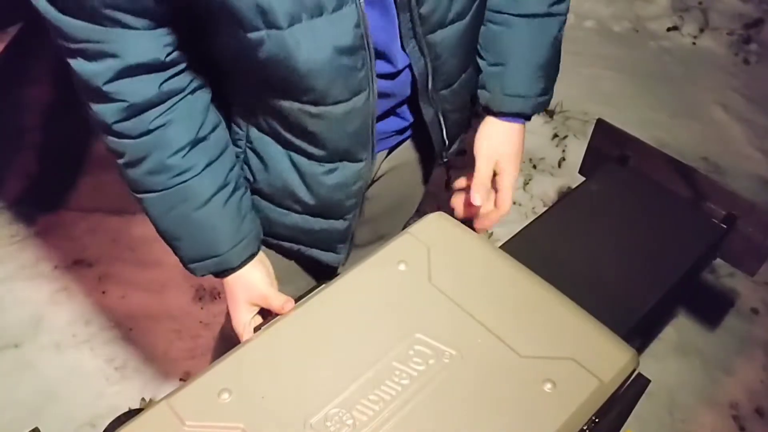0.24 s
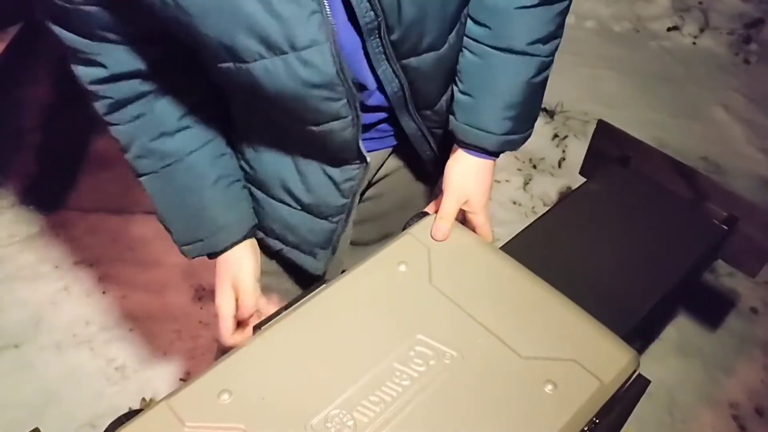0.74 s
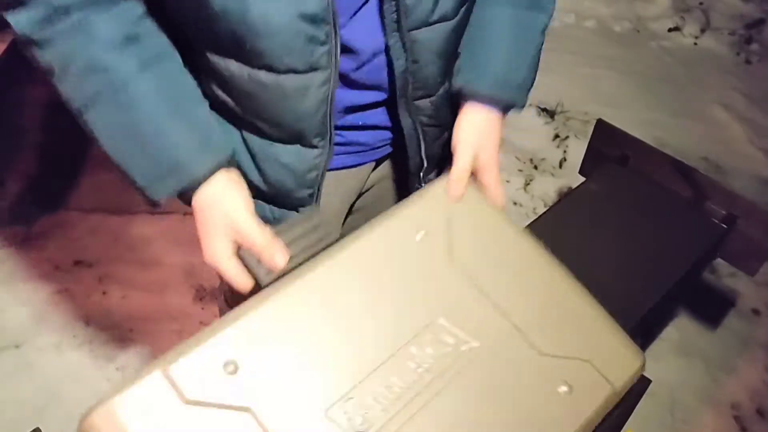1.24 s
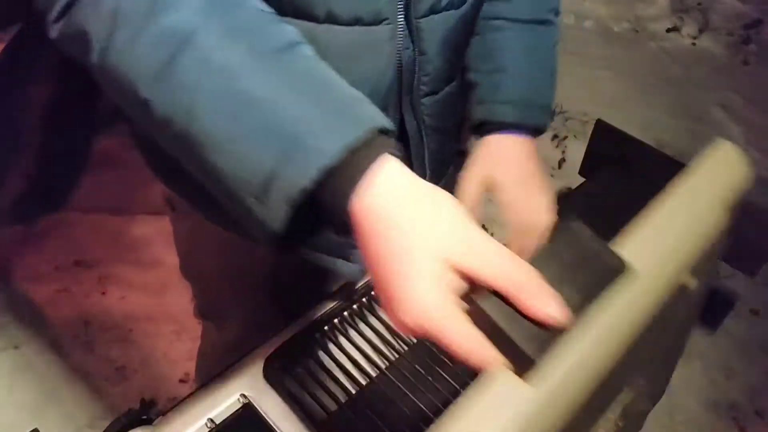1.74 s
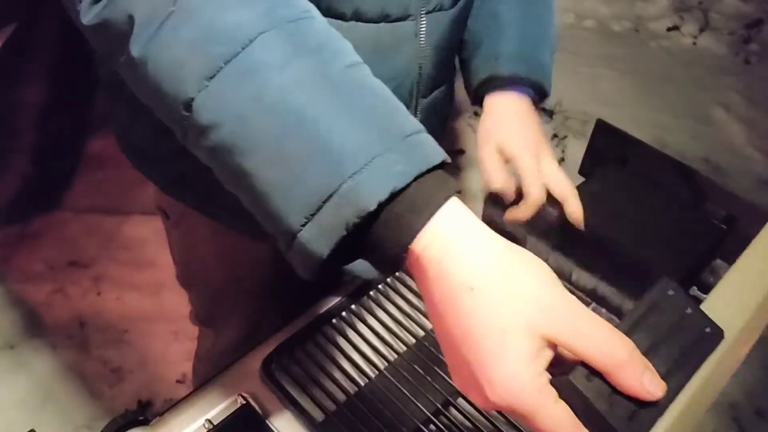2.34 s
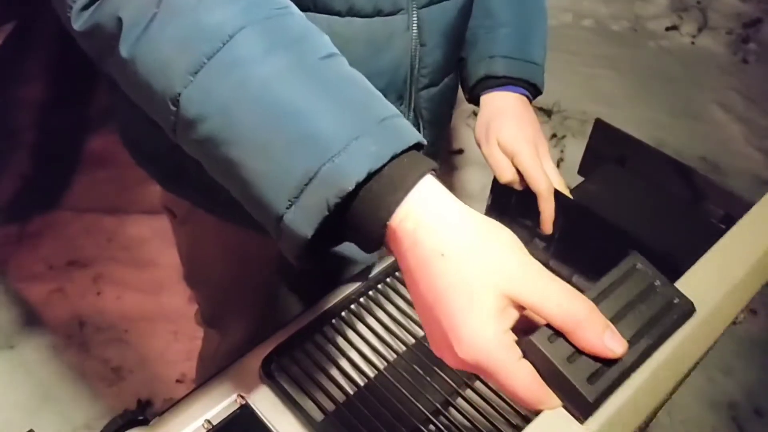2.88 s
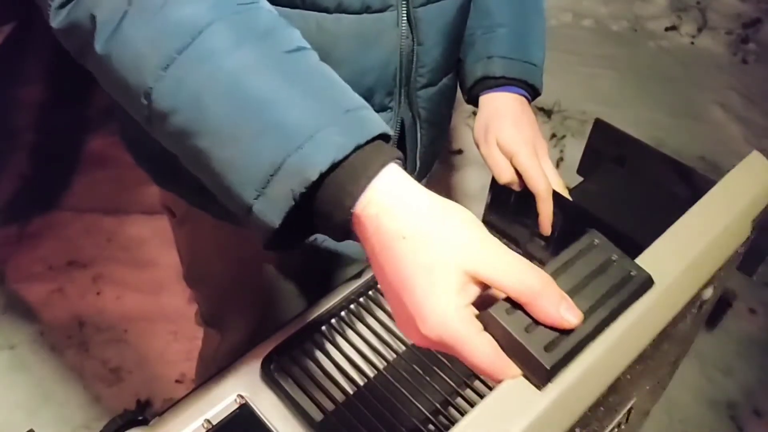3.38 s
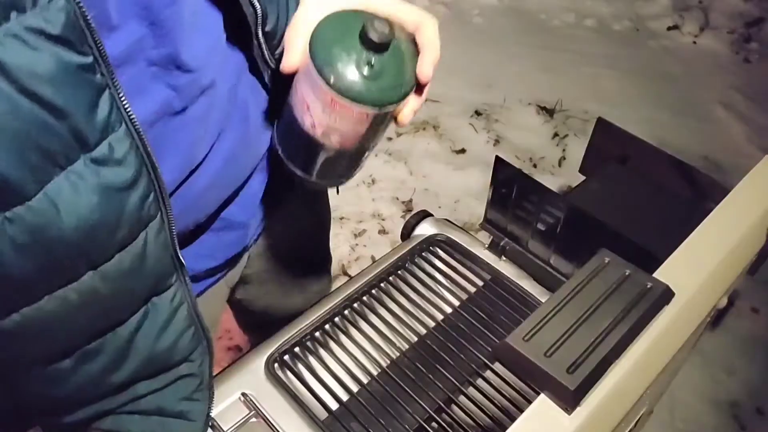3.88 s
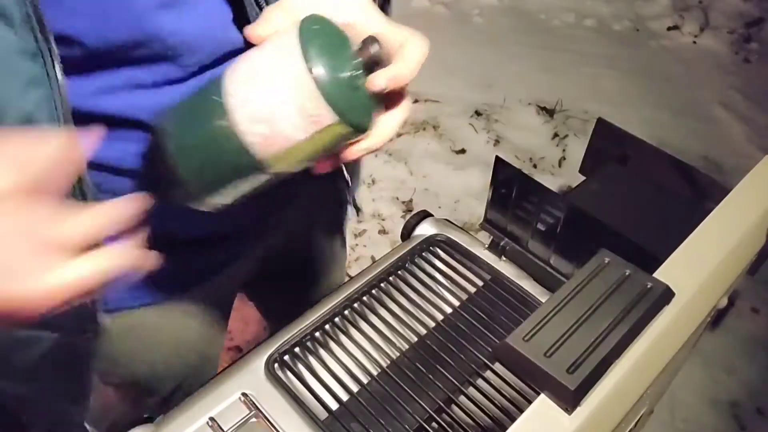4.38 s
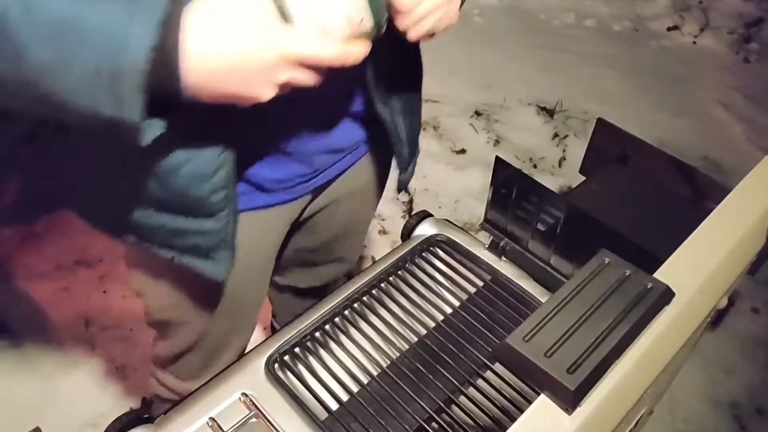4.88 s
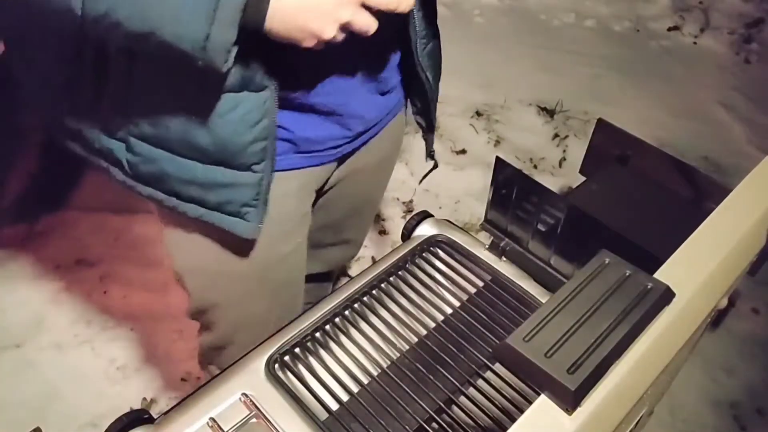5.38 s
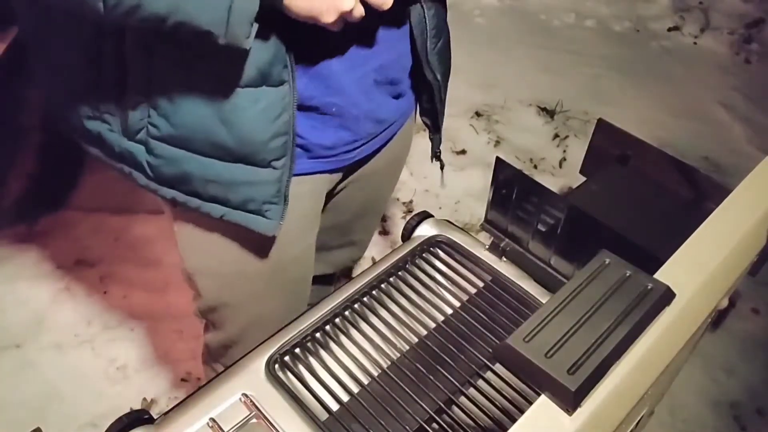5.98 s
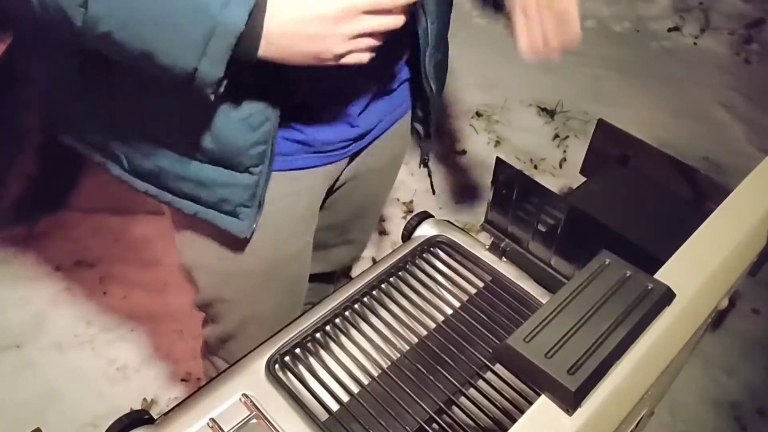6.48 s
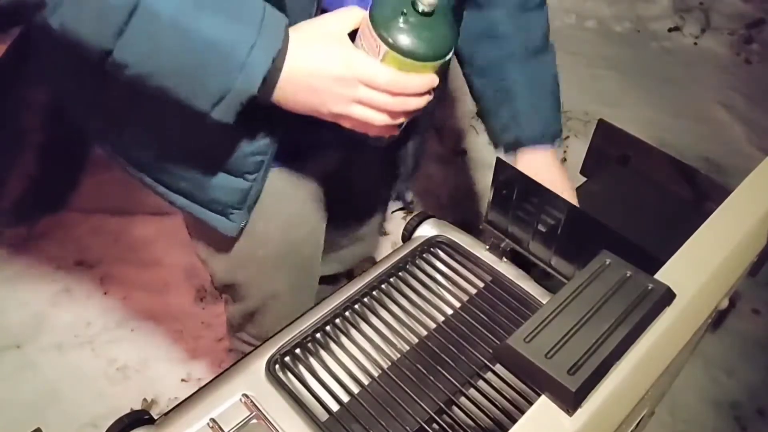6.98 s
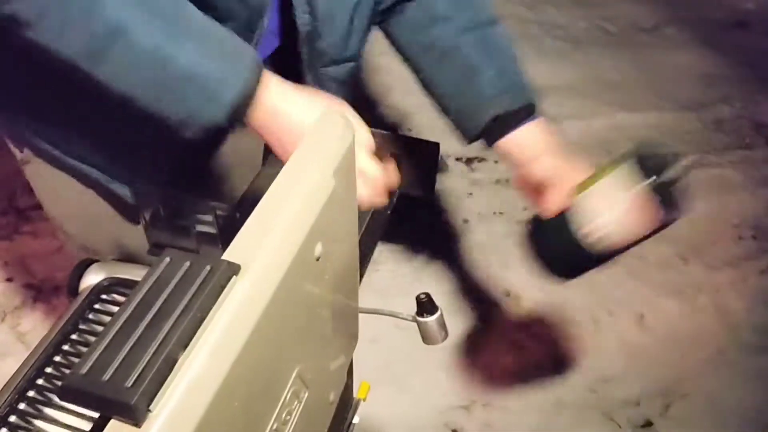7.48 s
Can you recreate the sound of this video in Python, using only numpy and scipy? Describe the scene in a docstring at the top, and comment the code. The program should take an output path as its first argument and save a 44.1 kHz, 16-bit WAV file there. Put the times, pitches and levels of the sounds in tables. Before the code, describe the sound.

Hands in a padded jacket open a camp grill: sharp hollow latch clacks, a gritty scrape, lid rattle and knocks, tiny squeaks. Around the middle a heavy low thump with microphone rumble dominates; then sparse snaps, metallic tick and quick ratcheting from a small cylinder cap. Nearby dry outdoor sound, quiet hum, hardly any wind.

```python
"""Camp grill and gas cylinder outdoors

A plastic-cased camp grill is unlatched, opened and knocked about; a small steel gas cylinder is uncapped.
Contacts are enveloped noise in four ranges, which excites damped case modes; thumps, steel and squeaks are sines.
A padded jacket and a quiet hum are noise shaped band by band; light wind is low noise with swelling rumbles.
Contacts and jacket gain short treble echoes; a microphone with a treble dip rounds the peaks and cuts the top.
"""
import sys
import numpy as np
from scipy import signal
from scipy.io import wavfile

SR = 44100
rng = np.random.default_rng(int(sys.argv[2]) if len(sys.argv) > 2 else 0)


def persist_wave(psi):
    """Save psi, clipped to +-1, as 16-bit WAV."""
    counts = np.round(np.clip(psi, -1, 1) * 32767).astype(np.int16)
    wavfile.write(sys.argv[1], SR, np.atleast_2d(counts).T)


N = 340893

# Event levels are source levels, ahead of flicker, echoes, stereo balance and microphone.
# Spectra give relative density; the noise they shape is scaled to rms 1.

# jacket: (time [s], rub level [dB], swish level [dB])
CLOTH = [(0.0, -54.5, -65.5), (0.45, -57, -65), (0.56, -64, -41), (0.71, -37, -70), (0.88, -58.5, -63),
         (1.38, -48.5, -60), (1.68, -59, -60), (1.89, -59.5, -62), (2.24, -52, -65), (2.47, -61.5, -76),
         (2.91, -67.5, -81), (3.72, -57, -73), (3.94, -56, -66.5), (4.35, -53, -59.5), (4.61, -59.5, -71),
         (5.34, -52.5, -66), (5.4, -59, -73), (5.81, -58, -70), (6.7, -57.5, -65), (7.25, -54, -64.5),
         (7.5, -55.5, -60), (7.73, -50, -59)]
# low rub of the cloth: (frequency [Hz], density [dB per Hz])
RUB_SPECTRUM = [(90, -3.5), (130, -2.5), (210, -2.5), (330, 3), (480, -1.5), (710, -10), (1000, -29.5)]
# brighter swish of the cloth: (frequency [Hz], density [dB per Hz])
SWISH_SPECTRUM = [(900, -14.5), (1300, 5.5), (1750, -7.5), (3400, -3.5), (5500, -7.5), (8000, -30.5)]
# crisp treble edge of the cloth: (frequency [Hz], density [dB per Hz])
CRISP_SPECTRUM = [(7000, -15), (9000, -7), (14500, -7.5), (16300, 1.5)]
# the crisp edge's level when the swish is at its mean, and its change in dB per dB of swish
CRISP_DB, SWISH_MEAN_DB, CRISP_FOLLOWS = -72, -62.5, 1.3

# background hum: (frequency [Hz], density [dB per Hz])
HUM_SPECTRUM = [(30, -10), (118, -3.5), (150, -4.5), (480, -10.5), (990, -39), (1430, -4), (1760, -33.5),
                (7500, -45), (16000, -47)]
HUM_DB = -67.5
# likeness of the channels in cloth and hum: (frequency [Hz], left-right correlation [-1 to 1])
LIKENESS = [(60, 0.9), (240, 1), (950, 0.073), (3500, 0.0042)]

# low wind and handling at the microphone: (time [s], level [dB], t60 [s], left over right [dB])
RUMBLES = [(0.6, -47.5, 1.3, -2), (3.858, -31.5, 0.83, -2), (5.92, -44.5, 0.54, 7), (6.11, -40, 0.63, -4),
           (7.05, -48.5, 1.03, 4), (7.65, -56, 1.4, -17)]
BREEZE_DB, RUMBLE_BUILD_S = -68.5, 0.041

# ranges shaken by a contact, in the order knock, clatter, tick, sizzle:
# (low [Hz], high [Hz], t60 factor [ratio], left-right correlation [-1 to 1], share of the pan [ratio])
RANGES = [(164, 651, 1.18, 0.94, -.08), (981, 3440, 1.17, 0.12, 0.93), (3460, 6760, 0.69, 0.071, 0.9),
          (8990, 37000, 0.26, 0.19, 1)]
# case, grate and hinge modes: (frequency [Hz], relative level [dB], t60 [s])
CASE_MODES = [(236, 2, .1), (270, -2, .15), (444, -3, .12), (493, -2, .1), (632, -2, .08), (1295, -9, .08),
              (1540, -11, .15), (2030, -12, .12), (2920, -11, .06), (3300, -9, .09), (4000, -9, .08),
              (4700, -9, .09), (5600, -9, .08), (747, -12, .2)]
# position of the hands: (time [s], treble left over right [dB], sizzle above tick [dB])
PLACE = [(0.501, 6.5, 1.5), (0.97, 1.5, 3), (2.301, 5.5, -4), (2.999, 7, -15.5), (3.601, 2.5, -12),
         (3.719, -4.5, 2), (4.101, -2, 6.5), (4.199, 3, 4), (5.2, 9.5, 7), (6.15, 4, 0.5), (6.451, 1, -15),
         (6.95, 0.5, -25), (7.03, 4, -3), (7.7, -1, -22)]

# In contact tables weight is knock above clatter, sharpness is tick above clatter, pitch is that of the # part
# struck, and each range scales t60 by its factor. # scrapes and scuffs, which swell, with the low body of the
# case thud at 3.855 s and the cap's softer first # ratchet click at 6.466 s: (time [s], clatter level [dB],
# weight [dB], sharpness [dB], t60 [s], # pitch [Hz], swell [s])
SCRAPES = [(0.2985, -56, 9.5, -2.5, 0.89, 4860, 0.039), (0.66, -43.5, 14, 8, 0.16, 2830, 0.048),
           (0.9491, -30, 8.5, -3, 0.21, 1340, 0.021), (0.978, -39.5, 16, -16, 0.11, 2000, 0.016),
           (1.019, -36, 10, -2, 0.2, 890, 0.011), (1.082, -42, 2, -3, 0.18, 1520, 0.0082),
           (1.147, -43.5, -21, -0.5, 0.086, 1630, 0.0059), (1.492, -44.5, -13, -20, 0.1, 1430, 0.007),
           (2.0292, -60, 19.5, 7, 0.91, 1320, 0.0024), (2.0992, -43.5, 9, 7.5, 0.22, 3400, 0.018),
           (2.256, -52.5, -3, -0.5, 0.19, 3450, 0.011), (2.3184, -52, 11.5, 0.5, 0.11, 1300, 0.0088),
           (3.855, -39.5, 15.5, -5, 0.2, 304, 0.014), (4.14, -46, -22, 3, 0.44, 3170, 0.01),
           (4.255, -35.5, -1.5, -6.5, 0.17, 4270, 0.006), (4.3514, -54, -4, 6.5, 1, 4470, 0.0027),
           (4.479, -38.5, -5, 5, 0.15, 3800, 0.023), (5.3191, -55, 10.5, -11, 0.085, 1330, 0.022),
           (6.17, -29, -15, -4, 0.02, 3670, 0.0073), (6.225, -56.5, -12, 6, 0.2, 4070, 0.017),
           (6.466, -44.5, -10, 0, 0.04, 3270, 0.0057), (6.745, -54, 6.5, -6, 0.17, 1340, 0.015),
           (7.0794, -49.5, 8.5, 3, 0.15, 3140, 0.06), (7.1386, -48, 6, -3.5, 0.11, 990, 0.041),
           (7.5287, -38, -2.5, -9, 0.21, 890, 0.061), (7.59, -53.5, -3, 3, 0.2, 3200, 0.038),
           (7.705, -50, 9.5, 2, 0.14, 2570, 0.014)]
# blows on the grill: (time [s], clatter level [dB], weight [dB], sharpness [dB], t60 [s], pitch [Hz])
BLOWS = [(0.5273, -15.5, 12.5, 3, 0.24, 1390), (0.612, -13, 6.5, -2.5, 0.14, 3046),
         (0.881, -53, 20, -18, 1, 1440), (0.9202, -32, -1, -2.5, 0.24, 1550),
         (1.5596, -35.5, 7.5, -25, 0.34, 1480), (1.6191, -27, -31.5, -4.5, 0.089, 3300),
         (1.7548, -33, -9, 3.5, 0.19, 5370), (3.0402, -62.5, 10, -14, 0.25, 1290),
         (3.1122, -59, 13.5, -12.5, 0.2, 1246), (3.27, -35, 4.5, -13.5, 0.33, 1375),
         (3.3283, -30.5, 5, 2, 0.2, 1620), (3.5477, -33, 8, 3, 0.19, 1506),
         (3.7484, -46.5, 12, -2, 0.9, 1044), (3.8194, -24.5, 7, 7, 0.08, 2920)]
# dry snaps of cap, cylinder and hands: (time [s], clatter level [dB], weight [dB], sharpness [dB],
# t60 [s], pitch [Hz])
SNAPS = [(1.483, -48.5, -14, 3.5, 0.03, 4760), (4.1728, -31, 2, 3, 0.13, 1300),
         (4.4465, -30.5, -3.5, 7.5, 0.025, 3300), (5.1352, -24.5, -1.5, -16.5, 0.014, 1144),
         (5.843, -50.5, 1.5, -21, 0.045, 1355), (6.1125, -41.5, -2.5, -19, 0.23, 1124),
         (6.8368, -28.5, -5.5, -19, 0.073, 1970), (6.8432, -28, -20, 1, 0.02, 2570),
         (6.9015, -28, -18, -14.5, 0.015, 2130), (7.0449, -47.5, 5, 1.5, 0.12, 1040),
         (7.669, -38, 6.5, -10, 0.027, 2340)]
BLOW_BUILD_S, SNAP_BUILD_S = 0.0045, 0.0016
SLIPS_PER_S, SLIP_S = 320, 0.0015   # mean rate and decay time of a rubbing part's catches

# thumps of the hollow case: (time [s], frequency [Hz], level [dB], t60 [s])
THUMPS = [(0.544, 121, -23.5, 0.41), (0.629, 159, -26, 0.31), (0.883, 264, -24, 0.02),
          (0.897, 271, -21.5, 0.081), (0.922, 264, -23.5, 0.084), (1.015, 302, -23.5, 0.085),
          (1.038, 101.6, -33, 0.22), (1.212, 300, -42.5, 0.13), (1.306, 316, -45, 0.092),
          (1.36, 283, -42, 0.11), (1.436, 308, -43, 0.17), (2.139, 110, -44.5, 0.22),
          (3.351, 160, -43, 0.5), (3.588, 105, -42.5, 0.14), (3.767, 130, -22, 0.3),
          (3.827, 211, -30, 0.26), (3.851, 122, -9, 0.16), (3.884, 131, -17, 0.16),
          (3.925, 127.5, -23.5, 0.16), (4.048, 151, -41.5, 0.28), (7.046, 111, -42, 0.06),
          (7.668, 264, -33.5, 0.13)]
# thumps below GENTLE_DB build over a share of their t60, harder ones over a fixed time
GENTLE_DB, THUMP_BUILD_SHARE, HARD_BUILD_S = -36, 0.078, 0.0045

# thin steel after a tap, first grate, then lid stay, then cylinder:
# (time [s], frequency [Hz], level [dB], t60 [s])
STEEL = [(0.62, 1233, -46.5, 0.75), (0.622, 2800, -57, 0.68), (3.335, 834, -51, 0.83),
         (3.335, 1780, -46.5, 0.23), (3.553, 1806, -48.5, 0.4), (5.139, 1845, -35, 0.17),
         (6.168, 1890, -45, 0.31)]
# short squeaks: (time of the middle [s], frequency [Hz], level [dB], length [s], overtone level [dB])
SQUEAKS = [(1.867, 1330, -49.5, 0.033, -12.5), (1.908, 1363, -58, 0.045, -6),
           (3.98, 1289, -50.5, 0.025, -21.5), (4.074, 1280, -52.5, 0.027, -45.5),
           (6.636, 1210, -52, 0.025, -15), (6.782, 401, -43.5, 0.014, -16)]
SQUEAK_SAG_PER_S = 0.32   # share of its pitch that a squeak loses each second
TONE_BALANCE_DB = np.array([[-1.5], [1.5]])   # left, right

# ratcheting cap
RATCHET_S, RATCHET_GAP_S = 6.4835, 0.0167   # first click, spacing
RATCHET_DB, RATCHET_LOSS_DB = -41, 0.8   # first clatter level, loss per click
RATCHET_WEIGHT_DB, RATCHET_SHARP_DB, RATCHET_T60_S, RATCHET_HZ = -10, -4, 0.022, 3200

# microphone: centre of the dip, share of that band subtracted, upper cutoff
MIC_DIP_HZ, MIC_DIP_SHARE, CUTOFF_HZ = 6930, 0.5, 16600


def amp(db):
    """Decibel law: 20 dB is a factor of ten in amplitude."""
    return 10 ** (np.asarray(db) / 20)


def rms_one(x):
    """Power normalization: scales a signal to rms 1."""
    return x / np.sqrt(np.mean(x ** 2) + 1e-20)


def in_time(rows):
    """Linear interpolation: reads the columns of a time table at every sample."""
    s, *columns = np.transpose(rows)
    return [np.interp(np.arange(N) / SR, s, c) for c in columns]


def at_hz(points, hz):
    """Logarithmic frequency scale: reads a spectrum between its points."""
    table_hz, values = np.array(points).T
    return np.interp(np.log(hz), np.log(table_hz), values)


def band(x, low_hz, high_hz, order=2):
    """Band-pass filtering: keeps one range, with its top limited to 0.45 SR."""
    edges = [low_hz, min(high_hz, .45 * SR)]
    return signal.sosfilt(signal.butter(order, edges, "band", fs=SR, output="sos"), x)


def drift(rate):
    """Low-pass random process: slow chance of rms 1, with two poles at rate [Hz]."""
    step = 40   # samples between drawn points
    r = np.exp(-2 * np.pi * rate * step / SR)
    white = rng.standard_normal(N // step + 2002)
    slow = signal.lfilter([1], [1, -2 * r, r * r], white)[2000:]   # drops the filter's start
    return np.interp(np.arange(N) / step, np.arange(len(slow)), rms_one(slow))


def ring(x, hz, t60):
    """Damped resonance: one mode, whose gain for white noise is 1 whatever its decay."""
    r, w = amp(-60 / (t60 * SR)), 2 * np.pi * hz / SR
    drive = np.sqrt((1 - r * r) / 2) * np.array([1, 0, -1])
    return signal.lfilter(drive, [1, -2 * r * np.cos(w), r * r], x + 1e-18)


def envelope(t, build, t60):
    """Exponential growth and decay: swells up to t = 0, then falls 60 dB in t60."""
    rise = t / max(build, 1e-4)
    decay = -np.log(1000) * t / max(t60, .005)
    return np.exp(np.where(t < 0, rise, decay))


def stereo(mid, side, alike):
    """Interchannel correlation: mixes mid and side into left and right of the given likeness."""
    alike = np.clip(alike, -1, 1)
    return (np.sqrt(1 + alike) * mid + np.sqrt(1 - alike) * side * [[1], [-1]]) / np.sqrt(2)


def coloured(spectrum, patchy_db, grain_db):
    """Spectral shaping: narrow bands of grainy stereo noise flicker partly together; rms 1."""
    low_hz, top_hz = spectrum[0][0], spectrum[-1][0]
    edges = np.geomspace(low_hz, top_hz, int(3 * np.log2(top_hz / low_hz)) + 2)   # about third octaves
    out, together = 0, drift(27)
    white = rng.standard_normal((2, 2, N)) * amp(grain_db * drift(150))
    for k, (low, high) in enumerate(zip(edges, edges[1:])):
        mid, side = band(white[k % 2], low, high)
        hz = np.sqrt(low * high)
        gain = amp(at_hz(spectrum, hz) + patchy_db * (0.5 * together + drift(15)))
        out = out + gain * stereo(mid, side, at_hz(LIKENESS, hz))
    return rms_one(out)


def jacket():
    """Friction noise: rub, swish and a crisp edge that follows the swish, as shaped noise."""
    rub_db, swish_db = in_time(CLOTH)
    crisp_db = CRISP_DB + CRISP_FOLLOWS * (swish_db - SWISH_MEAN_DB)
    cloth = amp(rub_db) * coloured(RUB_SPECTRUM, patchy_db=0.5, grain_db=-0.5)
    cloth += amp(swish_db) * coloured(SWISH_SPECTRUM, patchy_db=1.5, grain_db=0.0)
    cloth += amp(crisp_db) * coloured(CRISP_SPECTRUM, patchy_db=1.0, grain_db=0.0)
    return cloth


def nearby(x, echo_db=0.5, low_hz=900):
    """Early reflection: lid, tray and ground return dense treble echoes, different at each port."""
    size, t60_s = 8192, .06
    echoes = band(rng.standard_normal((2, size)), low_hz, SR / 2)
    echoes = echoes * envelope(np.arange(size) / SR, 1, t60_s)
    echoes = echoes / np.sqrt(np.sum(echoes ** 2, axis=1, keepdims=True))
    return x + amp(echo_db) * signal.fftconvolve(x, echoes, axes=1)[:, :N]


def hum():
    """Stationary noise: a steady background spectrum with slight random flicker."""
    return amp(HUM_DB) * coloured(HUM_SPECTRUM, patchy_db=-1.0, grain_db=1.0)


def wind():
    """Pressure fluctuation: lumpy low noise at the microphone ports, only partly shared by them."""
    t = np.arange(N) / SR
    mid, side = band(rng.standard_normal((2, N)), 39, 85, order=3) * amp(1.2 * drift(12))
    level = amp(BREEZE_DB)
    for s, level_db, t60, pan_db in RUMBLES:
        gains = amp([[level_db + pan_db / 2], [level_db - pan_db / 2]])
        level = level + gains * envelope(t - s, RUMBLE_BUILD_S, t60)
    return level * rms_one(stereo(mid, side, 0.56))


def stick_slip(slip):
    """Stick-slip friction: random catches decay on a steady part; rms 1."""
    caught = (rng.random(N) < SLIPS_PER_S / SR) * rng.exponential(1, N)
    catches = signal.lfilter([1], [1, -np.exp(-1 / (SLIP_S * SR))], caught)
    return rms_one(1 + slip * catches)


def contacts(rows, ring_db, crack_db, chatter_db, slip=0, crest_db=11.5, crack_t60=0.021,
             lag_per_db=4.0, centre_db=-4.0):
    """Modal excitation: contacts build, crack and rattle in four ranges, whose noise drives modes."""
    size, lead = 16384, 2048   # samples per contact, and before its peak
    t, out = (np.arange(size) - lead) / SR, np.zeros((2, N))
    place_s, *place = np.transpose(PLACE)
    touches = drift(260)   # loose parts touch unevenly
    slips = stick_slip(slip)
    for k, (low_hz, high_hz, longer, alike, pan_share) in enumerate(RANGES):
        shake = np.zeros((2, N + size))
        for s, clatter, weight, sharp, t60, centre_hz, build in rows:
            pan, sizzle = (np.interp(s, place_s, c) for c in place)
            range_db = clatter + (weight, 0, sharp, sharp + sizzle)[k]
            # narrow bands pass less noise, so they are driven harder
            force = amp(range_db) * np.sqrt(SR / 2 / (high_hz - low_hz))
            rattle = envelope(t, build, t60 * longer)
            crack = amp(crack_db) * envelope(t, build / 2, crack_t60)
            noise = stereo(*rng.standard_normal((2, size)), alike)
            if low_hz < centre_hz * 1.1 and centre_hz < high_hz * 1.1:
                # the part struck colours the noise
                noise = (noise + amp(centre_db) * ring(noise, centre_hz, 13.0 / centre_hz)) / 2
            left, right = noise * (rattle + crack) * force
            i = round(s * SR) - lead
            # the nearer port hears it first: lag in samples
            lag = round(lag_per_db * pan_share * np.clip(pan, -8, 8))
            shake[0, i:i + size] += left * amp(pan_share * pan / 2)
            shake[1, i + lag:i + lag + size] += right * amp(-pan_share * pan / 2)
        chatter = chatter_db * (touches + drift(24.0) / 2)   # partly each range's own
        shake = shake[:, :N] * amp(chatter - crest_db) + 1e-18
        shake = shake * (slips if k else 1)   # all but the knock follow the catches
        out += band(shake, low_hz, high_hz, order=3)
        for hz, level_db, t60 in CASE_MODES:
            if ring_db is not None and low_hz <= hz * 1.05 and hz < high_hz * 1.25:
                spot = amp(level_db + ring_db + 3.5 * drift(5))   # where it is hit changes what rings
                out += ring(shake * spot, hz, t60) * np.sqrt((high_hz - low_hz) / SR)
    return out


def struck(rows, build):
    """Common contact time: hits of one kind share their build-up."""
    return [(*row, build) for row in rows]


def scrapes():
    """Stick-slip excitation: swelling contacts with little crack, their upper ranges in catches."""
    return contacts(SCRAPES, centre_db=1.5, ring_db=-5.0, crack_db=-24.5, chatter_db=1.5, slip=1.4)


def blows():
    """Impact excitation: blows crack, rattle and ring the modes of case, grate and hinge."""
    return contacts(struck(BLOWS, BLOW_BUILD_S), ring_db=-3.5, crack_db=-1.5, chatter_db=1.0)


def thumps():
    """Low cavity mode: each thump of the hollow case booms on one slightly wavering sine."""
    t, out = np.arange(N) / SR, np.zeros(N)
    waver = np.cumsum(1 + .025 * drift(12)) / SR
    for s, hz, level_db, t60 in THUMPS:
        build = THUMP_BUILD_SHARE * t60 if level_db < GENTLE_DB else HARD_BUILD_S
        near = abs(t - s) < 2 * t60
        phase = 2 * np.pi * hz * (waver[near] - waver[round(s * SR)])
        out[near] += amp(level_db) * envelope(t[near] - s, build, t60) * np.sin(phase)
    return out * amp(1.5 * drift(30))


def steel():
    """Free damped vibration: thin steel rings on after a tap as decaying sines."""
    t, out = np.arange(N) / SR, np.zeros(N)
    for s, hz, level_db, t60 in STEEL:
        near = (t > s) & (t < s + 2 * t60)
        age = t[near] - s
        out[near] += amp(level_db - 60 * age / t60) * np.sin(2 * np.pi * hz * age)
    return out * amp(TONE_BALANCE_DB)


def snaps():
    """Short impact: dry snaps and ratchet clicks crack sharply without ringing the case."""
    rows = struck(SNAPS + ratchet(), SNAP_BUILD_S)
    return contacts(rows, ring_db=None, crack_db=4.5, chatter_db=-1.0)


def squeaks():
    """Stick-slip oscillation: short wavering tones with overtones sag in pitch."""
    t, out = np.arange(N) / SR, np.zeros(N)
    waver = np.cumsum(1 + 0.027 * drift(65.0)) / SR
    for s, hz, level_db, length, upper_db in SQUEAKS:
        near = abs(t - s) < 2 * length
        age = t[near] - s
        phase = 2 * np.pi * hz * (waver[near] - SQUEAK_SAG_PER_S * age ** 2 / 2)
        overtones = sum(np.sin(k * phase) for k in (2, 3, 4))
        tone = np.sin(phase) + amp(upper_db) * overtones
        out[near] += amp(level_db) * np.exp(-(age / length * 2) ** 2) * tone
    return out * amp(TONE_BALANCE_DB)


def ratchet():
    """Periodic impact: after a softer first click, the cap ratchets on with four evenly spaced clicks, each a
    little weaker."""
    tone = RATCHET_WEIGHT_DB, RATCHET_SHARP_DB, RATCHET_T60_S, RATCHET_HZ
    return [(RATCHET_S + k * RATCHET_GAP_S, RATCHET_DB - k * RATCHET_LOSS_DB, *tone) for k in range(4)]


def scene():
    """Superposition: echoing contacts and jacket join the direct sounds, slightly louder at right."""
    echoing = nearby(jacket() + scrapes() + blows() + snaps())
    direct = hum() + wind() + thumps() + steel() + squeaks()
    return (echoing + direct) * amp([[-.6], [.6]])


def record(dry):
    """Transducer response: a treble dip, soft saturation of the peaks and a steep upper cutoff."""
    dry = dry - MIC_DIP_SHARE * band(dry, MIC_DIP_HZ / 1.75, MIC_DIP_HZ * 1.7, order=1)
    rounded = .98 * np.tanh(dry / .98)
    return signal.sosfilt(signal.cheby2(12, 70, CUTOFF_HZ, fs=SR, output="sos"), rounded)


dry = scene()
out = record(dry)
persist_wave(out)
```